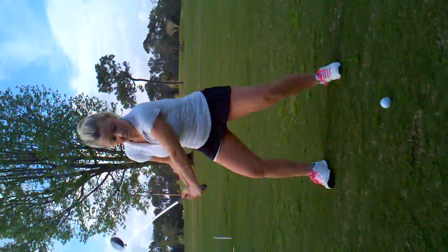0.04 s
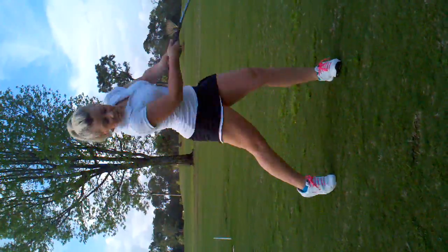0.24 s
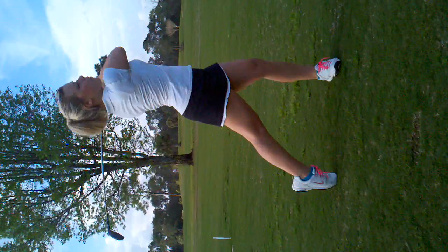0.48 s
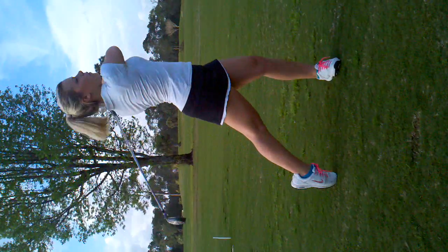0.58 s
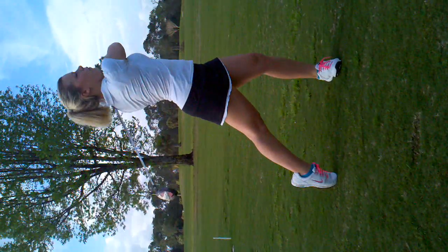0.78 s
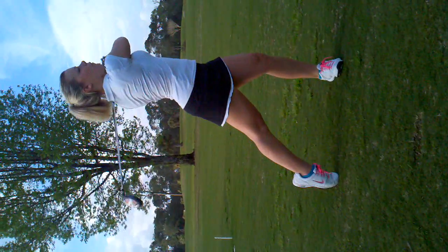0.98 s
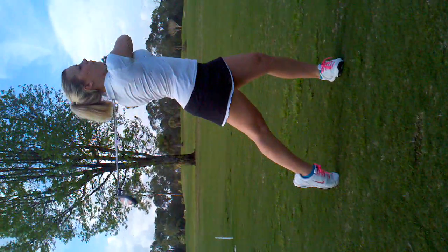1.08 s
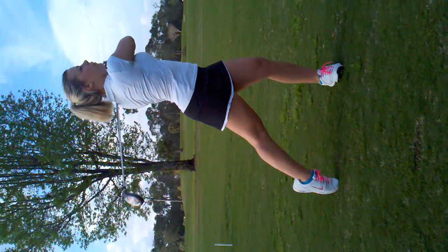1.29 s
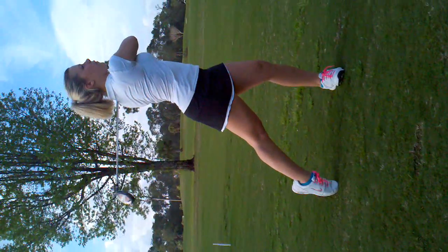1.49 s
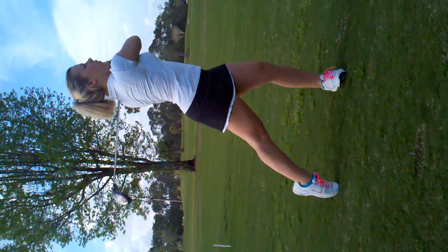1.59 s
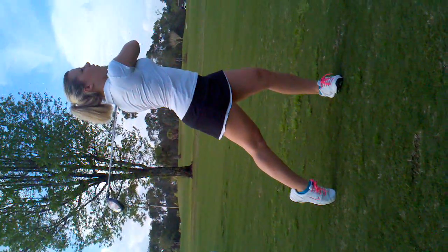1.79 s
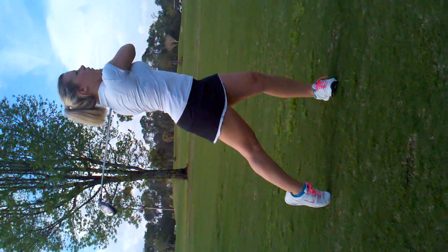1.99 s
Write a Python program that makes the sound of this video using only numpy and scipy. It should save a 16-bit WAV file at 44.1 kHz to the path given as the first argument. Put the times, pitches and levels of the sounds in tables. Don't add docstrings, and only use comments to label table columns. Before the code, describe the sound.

A golf shot, heard close outdoors. Faint distant traffic, a low drone and light hiss run throughout, with small wind bumps on the phone microphone. From about 0.15 s a fluttering whistle and rush of air swell; at 0.23 s the club brushes turf and cracks sharply on the ball, ringing very briefly. The whoosh ends by 0.29 s, sprayed grass hisses away until about 0.7 s, and quiet air with occasional soft wind thumps remains to 2 s.

```python
import sys
import numpy as np
from scipy import signal
from scipy.fft import rfft, irfft
from scipy.io import wavfile
from scipy.ndimage import uniform_filter1d

SR = 44100
rng = np.random.default_rng(int(sys.argv[2]) if len(sys.argv) > 2 else 0)


def volts(x):
    e = np.asarray(x, float) / 20
    return 10 ** e


def store_wav(level_fs):
    pcm = np.round(np.clip(np.atleast_2d(level_fs), -1, 1) * 32767)
    wavfile.write(sys.argv[1], SR, pcm.T.astype(np.int16))


N = 90404
T = np.arange(N) / SR


def noise():
    return rng.standard_normal(N)


def unit(x):
    return x / np.sqrt(np.mean(x ** 2))


def band(x, centre_hz, width_hz):
    return unit(signal.lfilter(*signal.iirpeak(centre_hz, centre_hz / width_hz, fs=SR), x))


def walk(rate_hz):
    hold = int(SR / rate_hz)
    steps = np.repeat(rng.standard_normal(N // hold + 1), hold)
    return 1.26 * uniform_filter1d(uniform_filter1d(steps, hold), hold)[:N]


def fade(start_s, t60_s):
    return (T >= start_s) * np.exp(-np.log(1000) * np.maximum(T - start_s, 0) / t60_s)


def air(spectrum, flicker_db):
    # time in seconds, level in dB.
    swell_points = [(0, 0), (.5, -3), (1.1, -3), (1.4, -0.5), (1.7, -0.5), (2.05, -0.5)]
    swell_db = np.interp(T, *np.array(swell_points).T)
    f = np.maximum(np.fft.rfftfreq(N, 1 / SR), 1)
    hz, density_db = np.array(spectrum).T
    spec = rfft(noise()) * volts(np.interp(np.log(f), np.log(hz), density_db)) * np.sqrt(SR / 2)
    octave = np.clip(np.log2(f / 30), 0, 9)
    out = 0
    for k in range(10):
        part = irfft(spec * np.maximum(1 - abs(octave - k), 0), N)
        depth = 1 if k < 7 else 0.3
        out = out + part * volts((flicker_db * walk(12) + swell_db) * depth)
    return out


def far_traffic():
    # frequency in Hz, level in dB per Hz.
    far_spectrum = [(40, -94), (110, -72), (400, -87.5), (800, -100), (1250, -99), (2200, -111),
                    (5500, -122), (14000, -119)]
    drone = volts(-61 + 2.5 * walk(9)) * band(noise(), centre_hz=210.8, width_hz=13)
    return air(far_spectrum, flicker_db=0.81) + drone


def diffuse_air():
    # frequency in Hz, level in dB per Hz.
    apart_spectrum = [(30, -96), (100, -86), (200, -87), (400, -94.5), (800, -101), (2000, -110),
                      (5500, -122), (14000, -119)]
    return air(apart_spectrum, flicker_db=2.5)


def wind_puffs():
    # centre in seconds, level in dB, pitch in Hz, length (Gaussian sigma) in ms.
    puff_rows = [(0.029, -41.5, 102, 13), (0.116, -31, 139, 4), (.138, -59, 110, 6), (0.155, -31, 115, 8.9),
                 (.208, -38.5, 111, 10), (0.273, -48, 110, 8.4), (0.326, -35, 102, 5.9), (.43, -46, 172, 5),
                 (0.464, -42, 100, 6), (.57, -42, 123, 8.4), (.60, -41, 95, 11.6), (.677, -26.5, 181, 3.7),
                 (0.687, -25, 140, 2.9), (0.914, -47.5, 86, 7.5), (1.195, -39.5, 170, 3.2),
                 (1.776, -46.5, 100, 9), (1.82, -29, 120, 1.8), (1.892, -48, 119, 6),
                 (1.943, -44, 100, 8.8), (1.987, -42.5, 110, 6)]
    out = np.zeros(N)
    for centre_s, db, hz, ms in puff_rows:
        t = T - centre_s
        envelope = np.exp(-(t / (ms / 1000)) ** 2 / 2)
        out += volts(db) * envelope * np.cos(2 * np.pi * (hz * t + rng.random()))
    raggedness = 0.44
    return (1 + raggedness * walk(350)) * out


def swing():
    # time in seconds, shedding pitch in Hz, level in dB.
    swing_points = [
        (.14, 400, -74),
        (.173, 470, -41),
        (.188, 490, -66),
        (.198, 480, -38),
        (.209, 520, -49),
        (.222, 540, -34),
        (.24, 450, -50.5),
        (0.255, 388, -38.5),
        (.285, 364, -75),
    ]
    s, hz, db = np.array(swing_points).T
    waver, flutter = 0.07, 0.35
    overtone_ratio, overtone_db = 2.6, -18
    rush_db, rush_peak_s, rush_rise_s = -51, 0.2294, 0.038

    phase = 2 * np.pi * np.cumsum(np.interp(T, s, hz) * (1 + waver * walk(200))) / SR
    level_db = uniform_filter1d(np.interp(T, s, db, left=-120, right=-120), size=200)
    tone = np.sin(phase) * (1 + flutter * walk(250))
    overtone = np.sin(overtone_ratio * phase) * walk(350) * volts(overtone_db)
    whistle = np.sqrt(2) * volts(level_db) * (tone + overtone)

    rush = band(noise(), 350, 350) + 0.76 * band(noise(), 1100, 800) + 0.5 * band(noise(), 9000, 7000)
    return whistle + volts(rush_db) * rush * np.exp(-abs(T - rush_peak_s) / rush_rise_s)


def turf_and_spray():
    start_s, turf_rise_s = 0.2262, 0.002
    turf_db, turf_t60_s = -31.5, 0.046
    spray_db, spray_t60_s = -58, 0.55

    grains = noise() * volts(4.5 * walk(900))
    turf = band(grains, 1500, 2500) + 2.9 * band(grains, 8000, 9000)
    turf_level = volts(turf_db) * fade(start_s, turf_t60_s) * np.clip((T - start_s) / turf_rise_s, 0, 1)
    spray = band(noise(), 9000, 8000) + 0.5 * band(noise(), 1300, 1200)
    return turf * turf_level + volts(spray_db) * fade(start_s, spray_t60_s) * spray


def ring_modes(push):
    # frequency in Hz, level in dB, t60 in seconds.
    head_modes = [(222, -17.5, 0.033), (520, -19.5, 0.024), (603, -23.5, 0.033), (830, -19, 0.023),
                  (1115, -20.5, 0.046), (1321, -16, 0.026), (1707, -11.5, 0.012), (2005, -3, 0.0089),
                  (2694, -6.5, 0.0059), (3573, -8, 0.013), (4090, -9, 0.0054), (6435, 4, 0.0026),
                  (8320, 12, 0.0029), (11560, 11.5, 0.0031)]
    out = np.zeros(N)
    for k, (hz, db, t60_s) in enumerate(head_modes):
        sign = (-1) ** (k + 1) if hz > 2400 else -1
        pole = np.exp((2j * np.pi * hz - np.log(1000) / t60_s) / SR)
        out += sign * volts(db) * signal.lfilter([1], [1, -pole], push).imag
    return out


def club_contacts():
    # start in seconds, level in dB, push length in ms, click in dB re level.
    contact_rows = [
        (.2280, -12, 0.49, -26),
        (.2313, -4.5, .06, 3.5),
        (0.233, -15.5, .14, -26.5),
        (0.235, -17.5, 0.18, -23.5),
        (.2370, -12, 0.15, -13.5),
        (.2435, -16.5, 0.45, -12),
    ]
    ring_db, click_level_db, spike_db = -4, -5.5, -6.5
    push, click = np.zeros(N), np.zeros(N)
    grit = signal.lfilter([1, -0.9], [1], noise())
    for start_s, db, ms, click_db in contact_rows:
        length_s = ms / 1000
        x = (T - start_s) / length_s
        pulse = np.where((x > 0) & (x < 1), np.sin(np.pi * x) ** 2, 0)
        push += volts(db) * pulse / (length_s * SR / 2)
        push[int(start_s * SR)] += volts(db + click_db + spike_db)
        click += volts(db + click_db) * fade(start_s, t60_s=0.0082) * grit
    return volts(ring_db) * ring_modes(push) + volts(click_level_db) * click


def scene():
    puff_opposite = 0.087
    hit_lag_ms, swing_lag_ms, swing_far_db = 0.02, 0.13, 6
    shadow_hz, shadow_floor, offset_db = 3000, 0.1, -56

    far, apart = far_traffic(), diffuse_air()
    wind = wind_puffs() / (1 + puff_opposite)
    whoosh = swing()
    hit = signal.lfilter(*signal.butter(2, 70, "high", fs=SR), turf_and_spray() + club_contacts())

    late_hit = np.interp(T - hit_lag_ms / 1000, T, hit)
    late_whoosh = np.interp(T - swing_lag_ms / 1000, T, whoosh)
    behind = late_hit + volts(swing_far_db) * late_whoosh
    low = signal.lfilter(*signal.butter(1, shadow_hz, fs=SR), behind)
    shaded = low + shadow_floor * (behind - low)

    first = (hit + whoosh) / 2 + far + apart - puff_opposite * wind
    second = shaded / 2 + far - apart + wind + volts(offset_db)
    return np.array([first, second])


def top_cut(x):
    return signal.sosfilt(signal.butter(12, 13920, fs=SR, output="sos"), x)


def record(dry):
    port_delay_samples, port_share = 17, 0.98
    hiss_db, hiss_hz = -69.5, 6260
    right_db, ceiling, top_hz = 0.5, 0.8, 13950

    late_other = np.pad(dry[::-1], ((0, 0), (port_delay_samples, 0)))[:, :N]
    hiss_filter = signal.butter(3, hiss_hz, "high", fs=SR, output="sos")
    hiss = signal.sosfilt(hiss_filter, rng.standard_normal((2, N)))
    x = dry - port_share * late_other + volts(hiss_db) * hiss
    x = ceiling * np.tanh(x * volts([[0], [right_db]]) / ceiling)
    x = signal.sosfilt(signal.ellip(8, 0.3, 32, top_hz, fs=SR, output="sos"), x)
    return top_cut(x)


dry = scene()
out = record(dry)
store_wav(out)
```